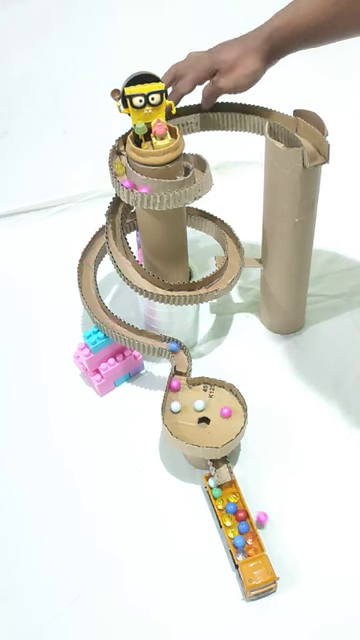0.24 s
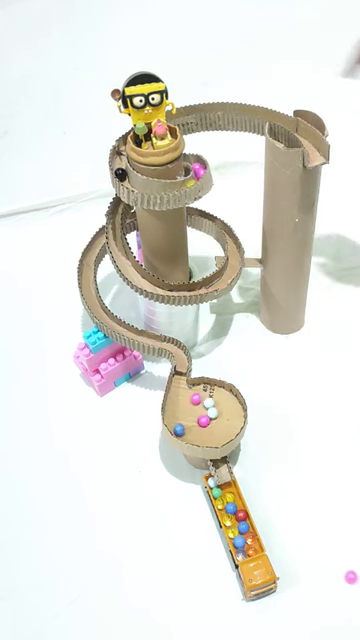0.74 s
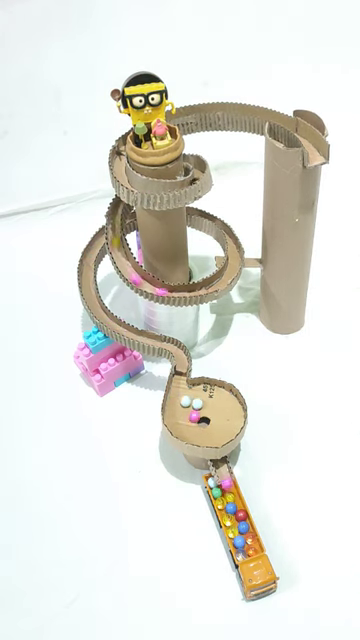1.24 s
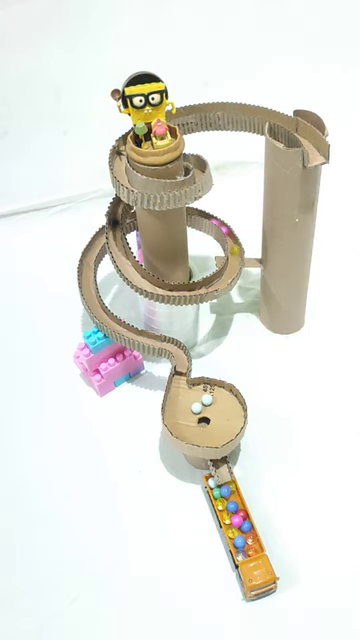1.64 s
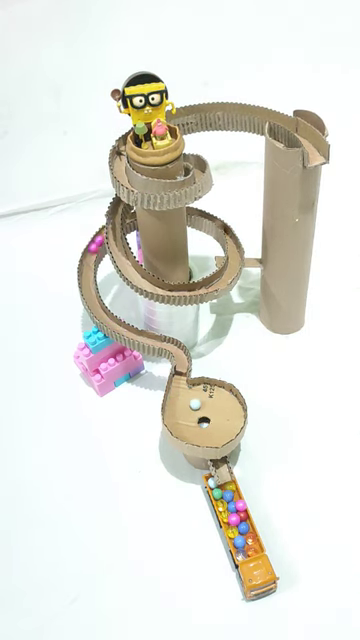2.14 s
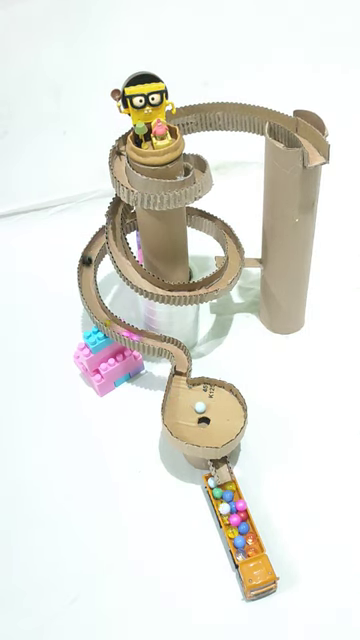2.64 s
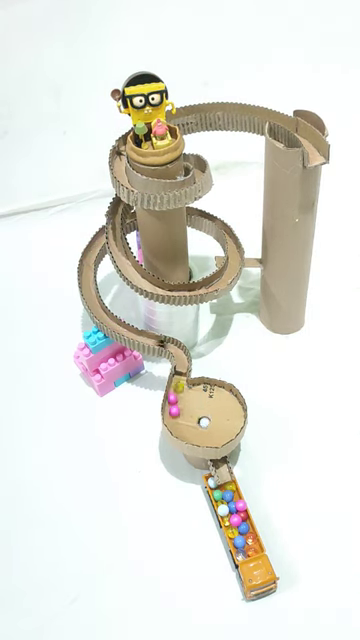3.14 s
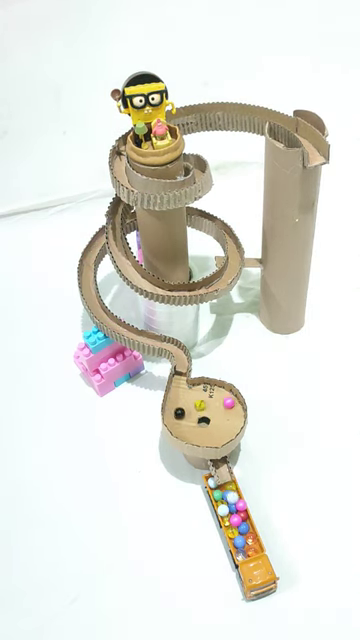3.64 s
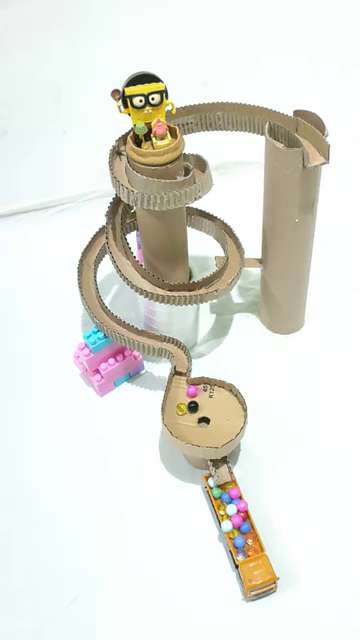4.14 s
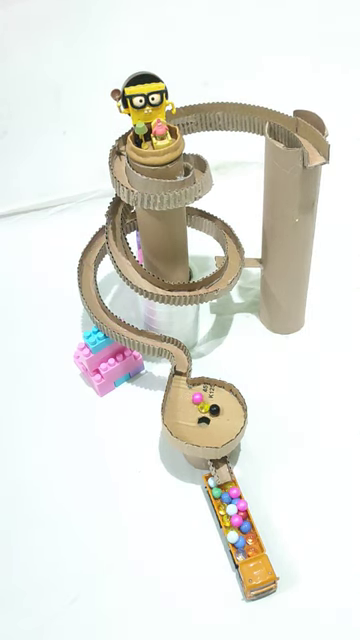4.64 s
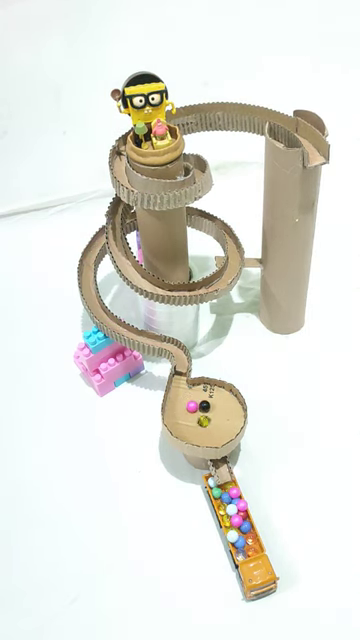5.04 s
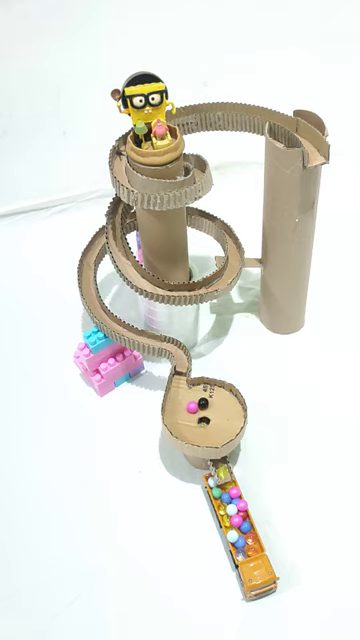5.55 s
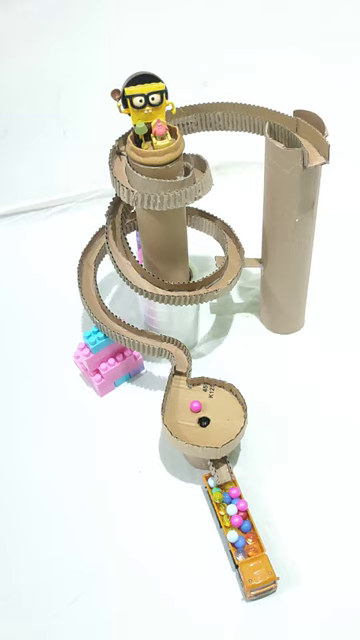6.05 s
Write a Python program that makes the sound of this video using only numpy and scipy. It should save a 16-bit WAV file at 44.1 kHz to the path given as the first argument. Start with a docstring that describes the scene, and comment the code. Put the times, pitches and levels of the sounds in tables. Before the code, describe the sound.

Glass marbles rattle and hum down a cardboard spiral, knock around a cardboard bowl, and drop with sharp cracks into a plastic toy truck.

```python
"""Marbles bouncing among others in a plastic toy truck are the main sound: cracks, then a short ringing shell.
Before they drop in, they knock and circle in a cardboard bowl: dull thuds with a ring and a low rumble.
Before that they run down a cardboard spiral: random taps on its ribs make a rattle, a second stream a hum.
Glass touches glass with tiny clicks. A bare, hard room echoes it all, over a faint background noise.
A two-port microphone stands close by, so the sound is in stereo."""
import sys
import numpy as np
from scipy import signal
from scipy.fft import rfft, irfft, next_fast_len
from scipy.io import wavfile

SR = 44100
rng = np.random.default_rng(int(sys.argv[2]) if len(sys.argv) > 2 else 0)


def put_to_file(sound):
    """Save the sound as 16-bit audio at rate SR, in the file named by the first command-line argument."""
    columns = np.atleast_2d(sound).T  # one column per channel
    safe = np.clip(columns, -1, 1)
    whole_steps = np.round(safe * 32767)
    wavfile.write(sys.argv[1], SR, whole_steps.astype(np.int16))


N = 276933
TIME = np.arange(N) / SR  # seconds

# Marbles landing and bouncing in the truck: t/s, level/dB, glassy treble/dB, pitch of the clack f/Hz
LANDINGS = [(.0307, 3, -1.5, 2760), (.1189, -6, -5, 2370), (.1719, -1, -2, 2880), (.2112, -5, -3, 3250),
            (.2268, 0.5, -1.5, 2940), (.2594, -6.5, -3, 3270), (.2872, 0, -6, 3730),
            (.425, -14.5, -5, 2370), (1.4159, 2, -1.5, 2720), (1.487, 0.5, -1.5, 3390),
            (1.5218, -3, -3.5, 3140), (1.5681, -10, -1.5, 3380), (1.5968, -10, -4.5, 2560),
            (1.697, 3.5, -0.5, 3060), (1.759, -6, -4, 2940), (1.796, -7.5, -5, 3070), (1.988, -1, 0, 3050),
            (2.0469, -1.5, -1, 2820), (2.089, -6.5, -5, 3290), (2.1178, -1.5, -5, 3370),
            (2.6244, -1, 0, 2620), (2.6713, -4, -2.5, 3300), (2.6946, -10, -3, 3240),
            (2.7305, -1.5, -5, 3150), (2.829, -19.5, -5, 3660), (3.7472, -3.5, -2, 2600),
            (3.7739, -2.5, -1, 3450), (3.8079, -4.5, -5, 2940), (3.8406, -9, -6, 3270),
            (4.1022, -1.5, 1, 3150), (4.134, -3.5, -6, 3240), (4.1598, -5, -7, 2980),
            (4.1932, -5, -5.5, 3140), (4.2252, -6, -6.5, 3610), (4.714, -14.5, -5, 2340),
            (4.8226, -22, -6.5, 2427), (5.7394, -1.5, -1.5, 2795), (5.7936, 1.5, -5, 2950),
            (5.8096, -5, -4.5, 2940), (5.9194, -16, -16, 2940), (6.014, -9.5, -7, 3700)]
# How much later the left port hears each landing spot: delay/samples
TRUCK_LAGS = (6, 5, 6, 7)
# One small hop follows every blow: earliest delay (s), range of the delay (s), level against the blow (dB)
HOP_S, HOP_RANGE_S, HOP_DB = 0.034, 0.12, -25
# The shell sounds less hollow as the truck fills (dB per s), and more hollow under a hard blow (dB per dB)
HOLLOW_DB, FILLING_DB_PER_S, HOLLOW_PER_DB = 3, 0.89, 0.1


def truck():
    """Marbles fall on plastic and on each other, each with a small hop; one stereo track per landing spot."""
    spots = np.zeros((len(TRUCK_LAGS), 2, N))
    for k, (s, db, glassy_db, clack_hz) in enumerate(LANDINGS):
        here = spots[k % len(spots)]
        next_spot = spots[(k + 1) % len(spots)]
        hollow_db = HOLLOW_DB - FILLING_DB_PER_S * s + HOLLOW_PER_DB * db
        blow = truck_blow(glassy_db, hollow_db, clack_hz)
        add(here, s + .0006, amp(db) * blow)  # sounds 0.6 ms after the listed time
        hop_s = s + HOP_S + HOP_RANGE_S * rng.random()
        hop = truck_blow(glassy_db, hollow_db, clack_hz)
        add(next_spot, hop_s, amp(db + HOP_DB) * hop)
    return spots


# Tone of glass striking plastic: f/Hz, level/dB
PLASTIC = [(150, -36.5), (500, -26), (900, -20), (1200, -6), (1600, 2), (1950, -5), (2900, -1),
           (3900, -3.5), (4900, -7.5), (7000, -4.5), (8300, -8), (9600, -12.5), (12000, -12),
           (14500, -20.5)]
# Ring of the loaded plastic truck: f/Hz, level/dB, time to fade by 60 dB t60/s
TRUCK_MODES = [(1320, -8, 0.02), (1490, -2, 0.092), (1653, 4, 0.072), (2250, -3, 0.1), (2300, -4.5, 0.12),
               (2830, -14.5, 0.014), (2940, -4, 0.023), (3110, -14.5, 0.018), (3448, 1.5, 0.065),
               (3730, 4.5, 0.037), (4240, -10, 0.028), (6880, -20.5, 0.023)]
SHELL_RING_DB = -12.5  # against the crack


def truck_blow(glassy_db, hollow_db, clack_hz):
    """Glass cracks on plastic and on the heap; the bending shell rings briefly."""
    t = TIME[:6144]
    push = unit(contact(t, spread_s=.0028, chatter=1.5))
    # the landing sets the neighbours in the heap clicking, from 8 ms on
    clicks = (rng.random(len(t)) < 130 / SR) * rng.standard_normal(len(t))
    jostle = clicks * np.exp(-t / 0.049) * (t > .008)
    crack = unit(colour(push + amp(-15.5) * jostle, PLASTIC))
    hit = crack + amp(SHELL_RING_DB) * ring(t, TRUCK_MODES, scatter_db=3, detune=.006)
    # a narrow peak for the clack, between the hollow lows and the glassy treble
    clack = [(clack_hz / 1.1, -1), (clack_hz, 4), (clack_hz * 1.057, -1)]
    return unit(colour(hit, [(1700, hollow_db), *clack, (7000, glassy_db)]))


# Marbles knocking against the bowl: t/s, level/dB, contact click against the knock/dB
KNOCKS = [(.016, -24, -17), (.12, -25, -14), (.156, -21.5, -10.5), (0.351, -16, -2), (.536, -27, -25),
          (.553, -13.5, -15), (.59, -23.5, -14), (.986, -11.5, -12), (1.303, -12.5, -8), (1.493, -12, -5.5),
          (2.241, -16.5, -19), (3.082, -14, -10), (3.145, -20, -12), (3.157, -15.5, -12), (3.199, -21, -11),
          (3.245, -18, -12.5), (3.295, -14, -17), (3.332, -21.5, -12.5), (3.362, -24, -14),
          (3.512, -15, -15), (3.564, -18, -9), (3.677, -24.5, -9.5), (3.718, -13, -9.5),
          (5.247, -17, -16.5), (6.185, -16.5, -18.5), (6.218, -24.5, -13)]
# Ring of the cardboard bowl: f/Hz, level/dB, time to fade by 60 dB t60/s
BOWL_MODES = [(381.9, -3.5, 0.26), (435.5, 2, 0.082), (441, 0.5, 0.23), (526, 2, 0.21), (569.5, 0, 0.41),
              (620, -17.5, 0.07), (658, -12, 0.34), (731, -8.5, 0.47)]
# Tone of a dull knock on cardboard: f/Hz, level/dB
CARDBOARD = [(100, -29), (250, -16.5), (340, -16.5), (440, -2), (620, -0.5), (710, -2), (800, -13),
             (1050, -22.5), (1450, -20.5), (2200, -33.5), (6000, -48.5)]
# Tone of the bright contact with cardboard: f/Hz, level/dB
SCUFF = [(300, -8), (800, 6.5), (1400, -8), (2000, 0), (3200, -5), (4900, -8), (7200, -5.5), (9800, -16),
         (14000, -17)]
BOWL_RING_DB = -4.5  # against the knock


def bowl():
    """The cardboard floor gives a dull knock and rings on; the contact itself clicks."""
    out, t = np.zeros((2, N)), TIME[:12000]
    for s, db, click_db in KNOCKS:
        knock = unit(colour(contact(t, spread_s=.005, chatter=.6), CARDBOARD))
        click = unit(colour(contact(t, spread_s=.003, chatter=1.6), SCUFF))
        floor_ring = ring(t, BOWL_MODES, scatter_db=0.5, detune=0.0024)
        hit = knock + amp(BOWL_RING_DB) * floor_ring + amp(click_db) * click
        add(out, s + .0005, amp(db) * hit)  # sounds 0.5 ms after the listed time
    return out


# Level of the rattle: the tail of an earlier landing first, then marbles on the spiral,
# from 3.45 s faint scuffing in the bowl: t/s, level/dB
RATTLE = [(0, -47.5), (.5, -67), (1.0, -62.5), (1.4, -56), (1.95, -60), (2.6, -66.5), (3.0, -62),
          (3.45, -75), (4.4, -81), (6.28, -90)]
# Marbles circling in the bowl: t/s, level/dB
CIRCLING = [(0, -74), (.4, -58.5), (.75, -71), (1.3, -64.5), (1.8, -69), (2.8, -70), (3.0, -59), (3.4, -74),
            (3.7, -65), (4.18, -63.5), (4.38, -91), (5.45, -84), (5.68, -67), (5.85, -72.5), (6.05, -86),
            (6.28, -57)]
# Tone of marbles on the ribs: f/Hz, level/dB
RIBS = [(300, -8), (800, -1.5), (1050, -1), (1200, -2), (1800, -1), (3200, -0.5), (4900, -7), (7200, -3.5),
        (9800, -13.5), (14000, -24.5)]
# Tone of the humming spiral: f/Hz, level/dB
HUM = [(100, -20), (170, -13), (238, -9), (260, -1), (278, 0), (300, -8), (340, -11), (600, -23),
       (1000, -32.5)]
# The hum holds its average level, then fades as the marbles reach the lower turns
HUM_DB, HUM_UNTIL_S, HUM_FADE_DB_PER_S = -61.5, 2.23, 8.5


def rolling():
    """Many tiny impacts make a pattering rattle, the hum of the spiral and the rumble round the bowl."""
    # dull taps and bright scuffs fall independently
    taps = colour(patter(per_s=350, spread_db=6, decay_s=.0015), [(2500, 0), (5000, -15)])
    scuffs = colour(patter(per_s=500, spread_db=5.7, decay_s=.001), [(2000, -15), (4000, -1)])
    rattle_db = np.interp(TIME, *np.transpose(RATTLE)) + 2.8 * wander(26)
    rattle = steady(colour(taps + scuffs, RIBS)) * amp(rattle_db)

    hum_db = HUM_DB - HUM_FADE_DB_PER_S * np.maximum(TIME - HUM_UNTIL_S, 0)
    hum = steady(colour(grains(per_s=530, spread_db=1.5), HUM)) * amp(hum_db + 0.86 * wander(9.7))

    # the same bumps give a rumble and a faint bright scuffing
    bumps = grains(per_s=420, spread_db=5)
    circling = steady(colour(bumps, CARDBOARD)) + amp(-26.5) * steady(colour(bumps, SCUFF))
    return rattle + hum + circling * amp(np.interp(TIME, *np.transpose(CIRCLING)))


def patter(per_s, spread_db, decay_s):
    """Random taps, each smeared by the card into its own short burst of noise."""
    power = np.convolve(grains(per_s, spread_db) ** 2, np.exp(-TIME[:256] / decay_s))[:N]
    return np.sqrt(power) * rng.standard_normal(N)


CHANCE_UNTIL_S = 3.9  # chance contacts stop after this time (s)
CONTACT_SCATTER_DB = 11.5  # chance contacts are up to this much louder or softer


def chance_contacts(per_s, db):
    """Contacts at uneven gaps, as rows t/s, level/dB; they follow the rattle's listed level."""
    gap, size = rng.random((64, 2)).T
    s = np.cumsum(2 * gap / per_s)
    level_db = np.interp(s, *np.transpose(RATTLE)) + db + CONTACT_SCATTER_DB * (2 * size - 1)
    return np.column_stack([s, level_db])[s < CHANCE_UNTIL_S]


SCRAPES_PER_S, SCRAPE_DB = 3.1, 24.5  # level against the rattle


def scrapes():
    """Now and then a short scrape stands out, with the tone of marbles on the ribs."""
    return ticks(chance_contacts(SCRAPES_PER_S, SCRAPE_DB), RIBS)


# Marble touching marble at set times: t/s, level/dB
TOUCHES = [(.4, -13.5), (.6564, -19), (.7813, -21), (.799, -20.5), (1.14, -28.5), (1.9576, -24),
           (2.3818, -25), (2.4207, -26), (3.061, -27), (3.157, -28), (3.487, -26.5), (3.9883, -21),
           (4.4425, -24), (4.5838, -34), (5.1629, -28)]
# Tone of glass on glass: f/Hz, level/dB
GLASS = [(800, -28), (2500, -24.5), (5000, -13), (6500, -3), (8000, 1.5), (9500, -4.5), (12000, -3.5),
         (14500, -19)]
TOUCHES_PER_S, TOUCH_DB = 3.4, 25  # chance touches, level against the rattle


def touches():
    """Hard glass meets hard glass for an instant: bright clicks, some at set times, some by chance."""
    return ticks(TOUCHES, GLASS) + ticks(chance_contacts(TOUCHES_PER_S, TOUCH_DB), GLASS)


def ticks(events, spectrum):
    """Very short, light contacts with the given tone."""
    out, t = np.zeros((2, N)), TIME[:1024]
    for s, db in events:
        tick = unit(colour(contact(t, spread_s=.0025, chatter=1.3), spectrum))
        add(out, s, amp(db) * tick)
    return out


# The room's echo: f/Hz, time to fade by 60 dB t60/s, level/dB
ROOM = [(200, 0.35, -2.5), (604, 0.21, 4), (1560, 0.3, 5.5), (2930, 0.32, 6.5), (7300, 0.38, 5.5),
        (13460, 0.22, 5)]


def room(x, build_s=0.0013, alike_hz=750):
    """Dense wall echoes: alike at both ports in the bass, unrelated in the treble."""
    t = TIME[:22050]
    hz = np.fft.rfftfreq(len(t), 1 / SR)
    # the first echoes stand apart, later ones merge
    noise = rng.standard_normal((2, len(t)))
    uneven_db = 4.5 * np.exp(-t / 0.11) * rng.standard_normal((2, len(t)))
    mid, side = rfft(noise * amp(uneven_db))
    alike = 1 / (1 + (hz / alike_hz) ** 4)
    ports = np.sqrt(1 + alike) * mid + np.array([[1], [-1]]) * np.sqrt(1 - alike) * side
    # each band of the echo fades at its own pace
    centres, tail = np.transpose(ROOM)[0], 0
    for share, (_, t60, db) in zip(np.eye(len(ROOM)), ROOM):
        band = irfft(ports * along(list(zip(centres, share)), hz))
        tail = tail + amp(db) * band * np.exp(-np.log(1000) * t / t60)
    tail *= (1 - np.exp(-(t / build_s) ** 2)) / np.sqrt(SR / 10)
    return signal.fftconvolve(x[None], tail, axes=1)[:, :N]


def place(x, lag, wet_db, right_db=0):
    """A source to the right reaches the left port later (lag in samples) and, if right_db is set, softer."""
    direct, all_round = np.broadcast_to(x, (2, N))
    left = np.concatenate([np.zeros(lag), direct])[:N]
    ports = np.array([amp(-right_db / 2) * left, amp(right_db / 2) * direct])
    return ports + amp(wet_db) * room(all_round)  # every call draws its own echoes


# Tone of the background noise: f/Hz, level/dB
QUIET = [(20, 5), (45, -7), (100, -12.5), (200, -17), (400, -22.5), (1000, -30.5), (3000, -36),
         (8000, -45.5), (14000, -43.5)]


def background():
    """Faint house rumble and hiss: random noise, mostly separate at the two ports."""
    common, left, right = (steady(colour(rng.standard_normal(N), QUIET)) for _ in range(3))
    return amp(-74) * common + amp(-59.5) * np.array([amp(-2) * left, right])


# Tone of the chatter after a blow: f/Hz, level/dB
SCATTER = [(1000, -6), (3500, 1), (6000, -8.5), (9000, -4.5), (14000, -8.5)]


def contact(t, spread_s, chatter):
    """A sharp blow in two rows: towards the microphone, with the chatter of nearby surfaces,
    and summed over all directions, where that chatter averages out."""
    blow = 1. * (t == 0)
    scattered = colour(rng.standard_normal(len(t)) * np.exp(-(t / spread_s) ** 2), SCATTER)
    return np.array([blow + chatter * unit(scattered), np.hypot(1, chatter) * blow])


def ring(t, modes, scatter_db, detune):
    """A struck body rings in fading tones; each blow weights and tunes them a little differently."""
    hz, db, t60 = np.transpose(modes)[:, :, None]
    weight, shift, phase = rng.standard_normal((3, len(modes), 1))
    waves = np.sin(2 * np.pi * (hz * (1 + detune * shift) * t + phase))
    fade = np.exp(-np.log(1000) * t / t60)
    tones = np.sum(amp(db + scatter_db * weight) * waves * fade, axis=0)
    return unit(tones * (1 - np.exp(-t * 2000)))  # soft start of about half a millisecond


def grains(per_s, spread_db):
    """Random tiny impacts of very unequal size."""
    hits = (rng.random(N) < per_s / SR) * rng.choice([-1, 1], N)
    return hits * amp(spread_db * np.minimum(rng.exponential(size=N), 4))


def wander(per_s):
    """Random ups and downs: straight lines between random points, per_s of them each second."""
    knots = rng.standard_normal(1024)
    return np.interp(TIME * per_s, np.arange(len(knots)), knots)


def amp(db):
    """Turn decibels into a plain factor."""
    return 10 ** (np.asarray(db) / 20)


def unit(x):
    """Scale each row to an energy of one."""
    return x / np.sqrt(np.sum(x ** 2, axis=-1, keepdims=True))


def steady(x):
    """Scale to a standard deviation of one."""
    return x / np.std(x)


def along(points, hz):
    """Read a spectrum on a log-frequency axis."""
    f, value = np.transpose(points)
    return np.interp(np.log(hz + 1), np.log(f), value)


def colour(x, points):
    """Filter with the given spectrum, so that nothing sounds before its cause."""
    size = next_fast_len(2 * x.shape[-1])
    gain = amp(along(points, np.fft.rfftfreq(size, 1 / SR)))
    # folding the cepstrum forward in time gives a minimum-phase filter
    cepstrum = irfft(np.log(gain), size)
    cepstrum[1:size // 2] *= 2
    cepstrum[size // 2 + 1:] = 0
    return irfft(rfft(x, size) * np.exp(rfft(cepstrum)), size)[..., :x.shape[-1]]


def add(track, s, sound):
    """Mix a sound in at time s (seconds)."""
    start = max(int(s * SR), 0)
    piece = sound[:, :max(N - start, 0)]
    track[:, start:start + piece.shape[1]] += piece


BOWL_LAG = 2  # samples by which the left port hears bowl and spiral later
TRUCK_RIGHT_DB = 5  # the right port hears the truck directly this much louder


def scene():
    """Truck, bowl and spiral in one room."""
    landings = sum(place(spot, lag, right_db=TRUCK_RIGHT_DB, wet_db=-3.5)
                   for spot, lag in zip(truck(), TRUCK_LAGS))
    knocks = place(bowl(), BOWL_LAG, wet_db=-1.5)
    run = place(rolling() + scrapes(), BOWL_LAG, wet_db=-1.5)
    glass = place(touches(), BOWL_LAG, wet_db=-11)
    return landings + knocks + run + glass + background()


def record(dry):
    """The recorder cuts the top, steeply above 14.4 kHz."""
    return signal.sosfilt(signal.ellip(8, .2, 70, 14400, fs=SR, output="sos"), dry)


dry = scene()
out = record(dry)
put_to_file(out)
```